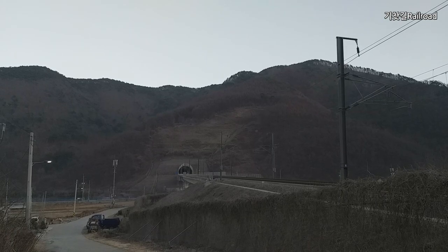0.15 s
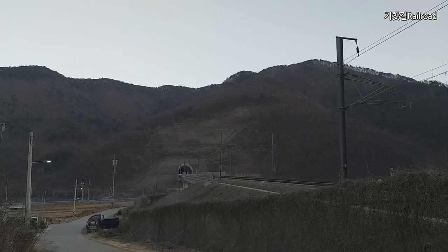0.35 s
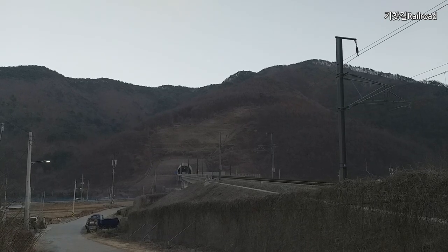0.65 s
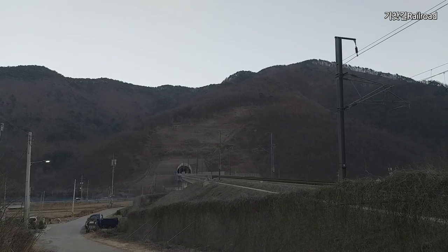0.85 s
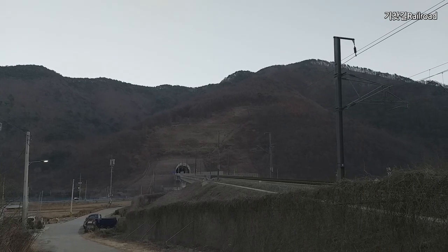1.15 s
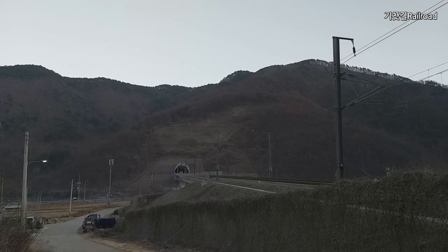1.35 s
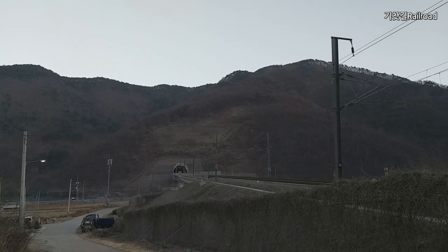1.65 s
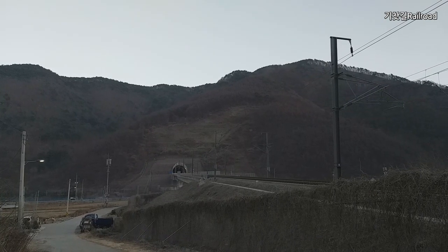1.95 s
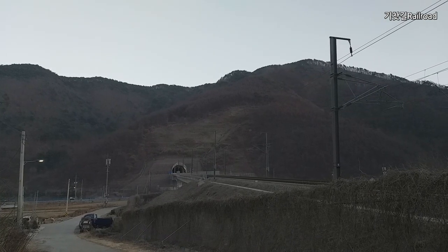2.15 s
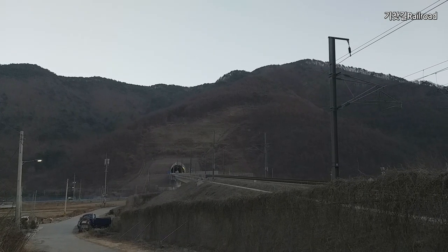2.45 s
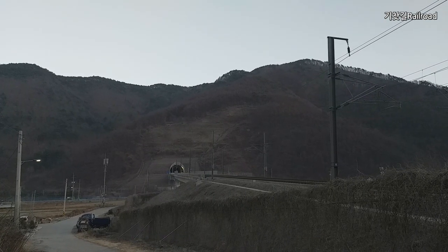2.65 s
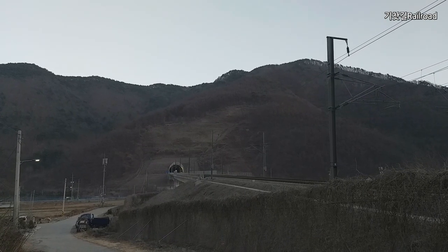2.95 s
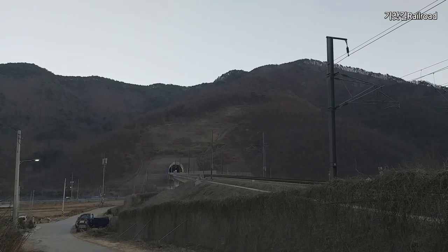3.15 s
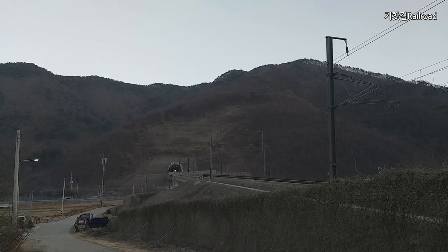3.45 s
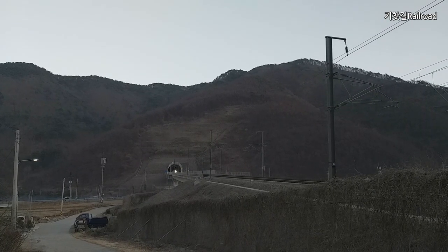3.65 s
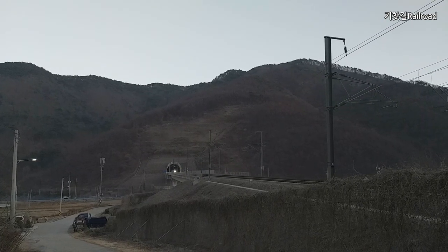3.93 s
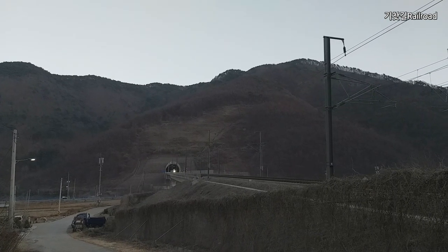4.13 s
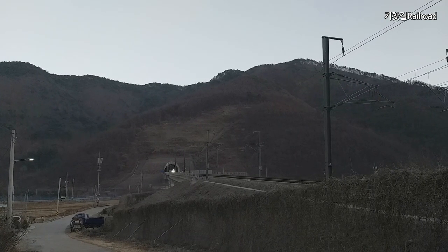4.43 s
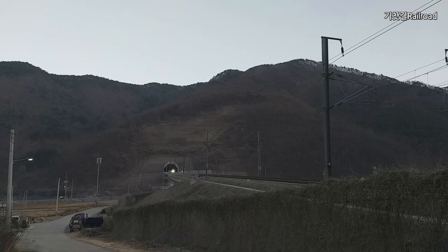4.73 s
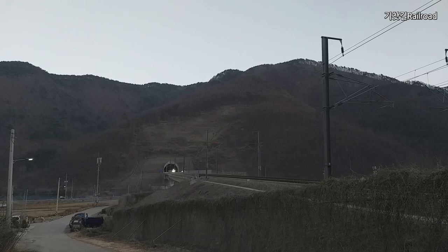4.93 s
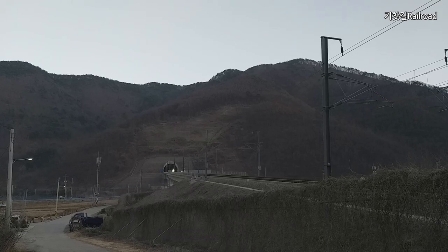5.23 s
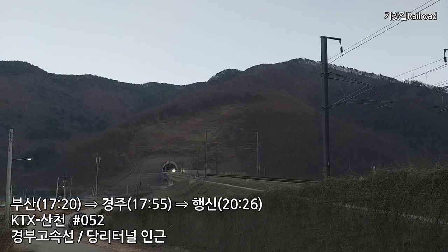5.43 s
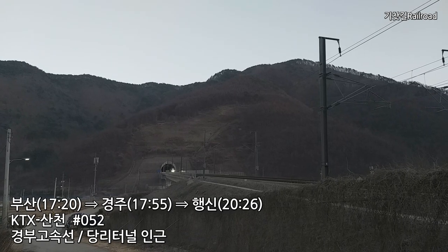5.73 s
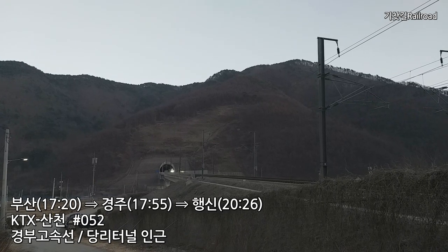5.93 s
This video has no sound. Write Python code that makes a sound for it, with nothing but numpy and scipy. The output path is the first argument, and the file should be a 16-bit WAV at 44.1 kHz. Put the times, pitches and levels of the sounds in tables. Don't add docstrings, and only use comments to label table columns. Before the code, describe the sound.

A soft low rumble and hollow middle howl come from a faraway tunnel, wavering with the air. Tiny bird whistles appear in the opening seconds. The unseen train nears, adding brighter rush, very high hiss from the overhead wire and a glassy singing from the rails. A brief, faint dry rub occurs close by late on. Open valley roadside, distant stereo pickup, slightly muffled with thin, patchy hiss.

```python
import sys
import numpy as np
from scipy import signal
from scipy.fft import rfft, irfft, next_fast_len
from scipy.io import wavfile

SR = 44100
rng = np.random.default_rng(int(sys.argv[2]) if len(sys.argv) > 2 else 0)


def wav_out(sig):
    wavfile.write(sys.argv[1], SR, np.round(np.clip(np.atleast_2d(sig).T, -1, 1) * 32767).astype(np.int16))


def voltage_ratio(decibels):
    exponent = np.asarray(decibels, float) / 20
    return 10 ** exponent


N = 268436
LONG = next_fast_len(N)

# (time [s], nearness as level of the rush [dB], swell of the air path [dB])
APPROACH = [(0, -83.5, -4), (.15, -79, -2), (.4, -75.5, -1.5), (.9, -71, 0), (1.4, -71, -0.5),
            (1.9, -71, 2), (2.3, -71, -3), (2.7, -69, -0.5), (3.2, -65.5, -1), (3.75, -64.5, -2),
            (4.0, -64.5, 0.1), (4.3, -64, 0.5), (4.6, -62.5, -0.5), (5.1, -58.5, -0.6), (5.5, -56.5, 0),
            (5.8, -56.5, 1.5), (6.09, -55.5, 1.5)]
# (frequency [Hz], density [dB per Hz])
ROAR_COLOUR_DB = [(15, -51.5), (25, -25), (86, -3.5), (139, -8.5), (240, -4.5), (279, -5), (370, -3),
                  (809, 2), (941, -3), (1250, -1.5), (1620, -13.5), (1930, -17.5), (2340, -17.5),
                  (3390, -45), (4500, -60.5), (5850, -90.5), (9900, -120)]
# (frequency [Hz], width [Hz], depth [dB])
GROUND_DIPS = [(148, 9.2, -6.5), (280.7, 14, -10.5), (320, 11, -3.5)]
# (frequency [Hz], width [Hz], lift [dB])
TUNNEL_PEAKS = [(90, 86, 5), (802, 72, 1), (1164, 120, 2), (1898, 220, 5)]
# (level at mid approach [dB], share of nearness [dB/dB], share of swell [dB/dB])
ROAR_PARTS = [
    (-52, 0.2, 0.17),
    (-50, 0.13, .4),
    (-46, 0.036, 1.01),
    (-55.5, .3, 0.23),
    (-59, 0.54, 0.24),
    (-57.5, .35, .3),
    (-62, 0.67, 0.12),
    (-63, 0.45, .1),
    (-67.5, 1.18, .01),
]
ROAR_EDGES_HZ = [(10, 130, 200, 300), (300, 450, 600), (600, 720, 870, 1030), (1030, 1170), (1170, 1300),
                 (1300, 1450, 1700), (1700, 1900), (1900, 2150), (2150, 2600, 6000)]
# (time [s], level [dB])
WIRE_LEVEL = [(0, -92.5), (1.3, -90.5), (1.5, -86), (1.95, -85), (2.1, -91), (2.6, -85), (3.5, -79.5),
              (4.3, -70.5), (4.6, -68), (5.1, -69), (5.7, -65), (5.9, -63.5), (6.09, -59.5)]
# (frequency [Hz], density [dB per Hz])
WIRE_COLOUR_DB = [(5240, -57), (8900, -19.5), (9120, -23.5), (9280, -11), (9990, -14), (11000, -10.5),
                  (11700, -6), (12100, -1), (12500, 2.5), (14100, -3), (14800, -12.5), (15000, -14.5)]
# (frequency [Hz], width [Hz], lift [dB])
WIRE_PEAKS = [(9730, 82, 6.5), (10200, 180, 6), (9800, 110, -3), (12550, 150, 2.5), (13300, 140, 5.5),
              (13400, 160, 0), (13650, 170, 3.5)]
# (time [s], length [s], start pitch [Hz], end pitch [Hz], level [dB])
BIRD_NOTES = [
    (.31, .065, 3950, 3020, -77),
    (1.755, .06, 4050, 3850, -84),
    (1.79, .04, 3750, 3500, -83),
    (1.82, .055, 3250, 3600, -83),
]
# (frequency [Hz], width [Hz], level [dB])
RAIL_MODES = [(6985, 32, -6), (7077, 24, 0), (7170, 80, -9), (7287, 36, -6), (7386, 22, -3),
              (7250, 500, -14), (7700, 260, -28), (5700, 500, -34), (6400, 400, -31.5)]
# (time [s], length [s], level [dB])
SCUFF_EVENTS = [
    (5.33, .07, -78.5),
    (5.39, .08, -80),
    (5.46, .11, -76.5),
]
# (frequency [Hz], level re common part [dB])
UNLIKE_DB = [(450, -72), (600, -48), (770, -36), (1200, -24), (2000, -23), (7500, -16), (9500, -6),
             (12500, -12)]
# (frequency [Hz], level of an equal white noise [dB])
GATE_DB = [(2500, -76), (3100, -73), (3400, -72.5), (3750, -74), (4300, -74.2), (4800, -73.4), (5600, -73),
           (6850, -73.5), (7500, -72.5), (8250, -69), (9000, -72.5), (11300, -73), (12000, -72.5),
           (12750, -74.7), (13500, -74.5), (14250, -75.5), (15000, -79.5)]
GATE_OPEN_FRAMES = [0, 1, 2, 3, 4, 5, 6, 7, 17, 20, 23, 24, 25, 52, 67, 109]
GATE_EDGES_BINS = [108, 120, 132, 144, 160, 176, 196, 216, 240, 264, 292, *range(320, 700, 32), 942]

NEAR_REF_DB, ROAR_PATCHY_DB = -66, .7
GUST_S, GUST_LENGTH_S, GUST_DB = 2.85, 0.94, 3.5
BANK_ECHO_S, BANK_ECHO_DB, BANK_DULL_HZ = .0237, -16, 900
LOWER_DB, LOWER_FOLLOWS, LOWER_REF_DB = -81.7, 1.45, -67
RAIL_FULL_S, RAIL_FULL_DB, RAIL_RISE_DB_PER_S = 5.87, -64.5, 10
RAIL_WAKES_S, RAIL_ASLEEP_DB, RAIL_FAINT_DB = 2.6, -12, -88
RAIL_LULL_S, RAIL_LULL_LENGTH_S, RAIL_LULL_DB = 5.6, .2, -6
PORT_HZ, PORT_WIDTH_HZ, PORT_DB = 1950, 900, -14.5
MIC_CUT_HZ, HISS_DB = 45, -76
GATE_JITTER_DB, GATE_RISE_DB, MASK_RISE_DB, MASK_TOP_HZ = 1.3, 1.2, 2.2, 8500


def at_hz(points, hz):
    points = np.array(points, float)
    return np.interp(np.log(hz), np.log(points[:, 0]), points[:, 1])


def in_time(rows):
    s, *columns = np.transpose(rows)
    return [np.interp(np.arange(N) / SR, s, c) for c in columns]


def rms_one(x):
    return x / np.sqrt(np.mean(x ** 2) + 1e-30)


def bell(hz, mid_hz, width_hz):
    return 1 / (1 + (2 * (hz - mid_hz) / width_hz) ** 2)


def bumps(rows, hz):
    return sum(db * bell(hz, mid_hz, width_hz) for mid_hz, width_hz, db in rows)


def drift(rate_hz):
    points = rng.standard_normal(400)
    at = np.arange(N) / SR * np.clip(rate_hz, .1, 60)
    whole = at.astype(int)
    blend = np.sin(np.pi / 2 * (at - whole)) ** 2
    return points[whole] * (1 - blend) + points[whole + 1] * blend


def noise_spectrum(gain):
    hz = np.fft.rfftfreq(LONG, 1 / SR) + 1
    common, unlike = rfft(rng.standard_normal((2, LONG))) * gain(hz)
    unlike = unlike * voltage_ratio(at_hz(UNLIKE_DB, hz))
    return hz, np.array([common + unlike, common - unlike])


def cut(hz, spectrum, low_hz, high_hz, soft=0.04):
    def step(edge_hz):
        return np.clip(np.log(hz / edge_hz) / soft / 2 + .5, 0, 1)
    return irfft(spectrum * (step(low_hz) - step(high_hz)), LONG)[:, :N]


def burst(s, length_s):
    return np.sin(np.pi * np.clip((np.arange(N) / SR - s) / length_s, 0, 1)) ** 2


def roar():
    def colour(hz):
        return voltage_ratio(at_hz(ROAR_COLOUR_DB, hz) + bumps(GROUND_DIPS + TUNNEL_PEAKS, hz))
    hz, spectrum = noise_spectrum(colour)
    near_db, swell_db = in_time(APPROACH)
    out = 0
    for edges_hz, (db, nears, swells) in zip(ROAR_EDGES_HZ, ROAR_PARTS):
        part = 0
        for low_hz, high_hz in zip(edges_hz, edges_hz[1:]):
            part = part + voltage_ratio(ROAR_PATCHY_DB * drift(2.438)) * cut(hz, spectrum, low_hz, high_hz)
        if edges_hz is ROAR_EDGES_HZ[-1]:
            db = db + GUST_DB * burst(GUST_S, GUST_LENGTH_S)
        level_db = db + nears * (near_db - NEAR_REF_DB) + swells * swell_db
        out = out + voltage_ratio(level_db) * rms_one(part)
    return out


def bank_echo(direct):
    lag = round(BANK_ECHO_S * SR)
    dull = signal.lfilter(*signal.butter(1, BANK_DULL_HZ, fs=SR), direct)
    return voltage_ratio(BANK_ECHO_DB) * np.pad(dull, ((0, 0), (lag, 0)))[:, :N]


def wire():
    def colour(hz):
        return voltage_ratio(at_hz(WIRE_COLOUR_DB, hz) + bumps(WIRE_PEAKS, hz))
    hz, spectrum = noise_spectrum(colour)
    upper_db, = in_time(WIRE_LEVEL)
    lower_db = LOWER_DB + LOWER_FOLLOWS * (upper_db - LOWER_REF_DB)
    upper = rms_one(cut(hz, spectrum, 11500, 14620, soft=.006))
    lower = rms_one(cut(hz, spectrum, 8900, 11500, soft=.006))
    return upper * voltage_ratio(upper_db + 1.2 * drift(17)) + lower * voltage_ratio(lower_db + 2.5 * drift(14))


def microphone_hiss():
    common, *own = rng.standard_normal((3, N))
    shape = signal.butter(3, [2400, 14200], "band", fs=SR, output="sos")
    return voltage_ratio(HISS_DB) * signal.sosfilt(shape, .8 * common + .55 * np.array(own))


def bird():
    t, out = np.arange(N) / SR, 0
    for s, length_s, from_hz, to_hz, db in BIRD_NOTES:
        pitch_hz = from_hz + (to_hz - from_hz) * np.clip((t - s) / length_s, 0, 1)
        out = out + voltage_ratio(db) * burst(s, length_s) * np.sin(2 * np.pi * np.cumsum(pitch_hz) / SR)
    return out


def rail():
    def modes(hz):
        return np.sqrt(sum(voltage_ratio(2 * db) * bell(hz, mid_hz, width_hz) ** 2
                           for mid_hz, width_hz, db in RAIL_MODES))
    ring = rms_one(cut(*noise_spectrum(modes), 4000, 9000))
    t = np.arange(N) / SR
    level_db = RAIL_FULL_DB + RAIL_RISE_DB_PER_S * np.minimum(t - RAIL_FULL_S, 0)
    level_db = np.maximum(level_db, RAIL_FAINT_DB)
    level_db = level_db + RAIL_ASLEEP_DB * np.clip((RAIL_WAKES_S - t) / .3, 0, 1)
    level_db = level_db + RAIL_LULL_DB * burst(RAIL_LULL_S, RAIL_LULL_LENGTH_S)
    return ring * voltage_ratio(level_db + 0.67 * drift(10))


def scuffs():
    hz, spectrum = noise_spectrum(lambda hz: 1)
    rub = rms_one(cut(hz, spectrum, 3300, 5900, soft=.08))
    return rub * sum(voltage_ratio(db) * burst(s, length_s) for s, length_s, db in SCUFF_EVENTS)


def scene():
    direct = roar()
    return direct + bank_echo(direct) + wire() + bird() + rail() + scuffs()


def port_tip(dry):
    port = signal.iirpeak(PORT_HZ, PORT_HZ / PORT_WIDTH_HZ, fs=SR)
    tip = voltage_ratio(PORT_DB) * signal.filtfilt(*port, dry.mean(axis=0))
    return dry + tip * [[1], [-1]]


def band_gate(x):
    frame = dict(window="cosine", nperseg=1882, noverlap=941, scaling="psd")
    hz, s, cells = signal.stft(x, SR, **frame)
    is_open = np.isin(np.arange(len(s)), GATE_OPEN_FRAMES)
    progress = s / s[-1]
    jitter_db = GATE_JITTER_DB * rng.standard_normal((len(GATE_EDGES_BINS), len(s)))
    for low, high, waver_db in zip(GATE_EDGES_BINS, GATE_EDGES_BINS[1:], jitter_db):
        power = SR * np.mean(np.abs(cells[:, low:high]) ** 2, axis=(0, 1))
        rise_db = GATE_RISE_DB * progress ** 2 + MASK_RISE_DB * progress ** 6 * (hz[low] < MASK_TOP_HZ)
        threshold_db = at_hz(GATE_DB, hz[low]) + waver_db + rise_db
        forced = is_open & (high <= 576)
        cells[:, low:high] *= forced | (power > voltage_ratio(2 * threshold_db))
    return signal.istft(cells, SR, **frame)[1][:, :N]


def top_cut(x):
    return signal.sosfilt(signal.butter(12, 15650, fs=SR, output="sos"), x)


def record(dry):
    bass_cut = signal.butter(2, MIC_CUT_HZ, "high", fs=SR, output="sos")
    wet = signal.sosfilt(bass_cut, port_tip(dry))
    mix = band_gate(wet + microphone_hiss())
    return top_cut(mix)


dry = scene()
out = record(dry)
wav_out(out)
```